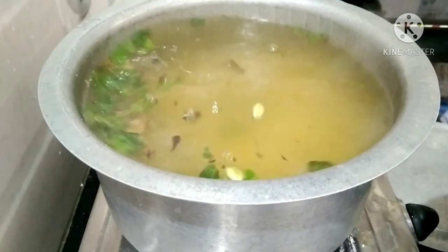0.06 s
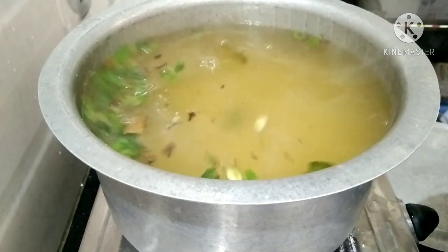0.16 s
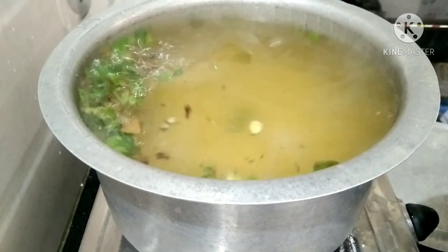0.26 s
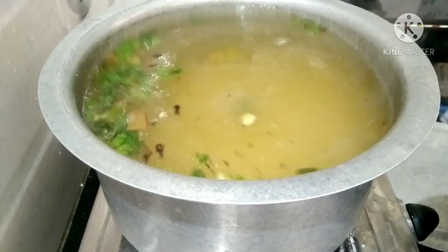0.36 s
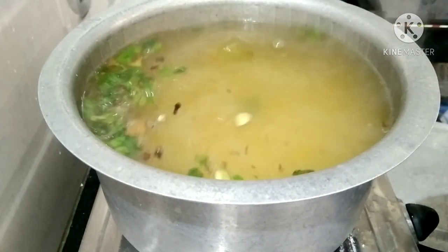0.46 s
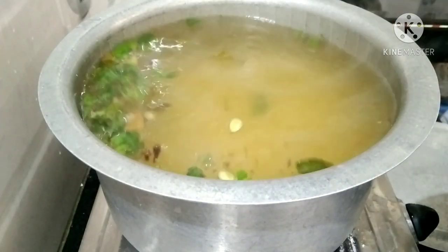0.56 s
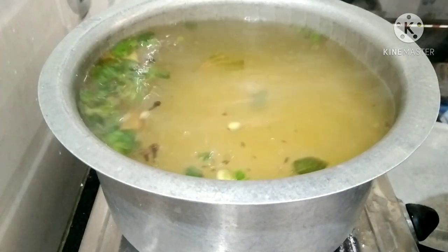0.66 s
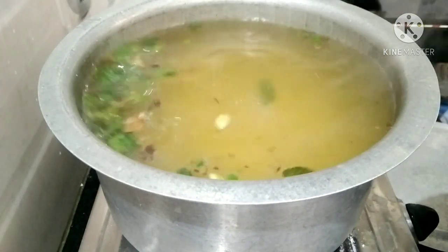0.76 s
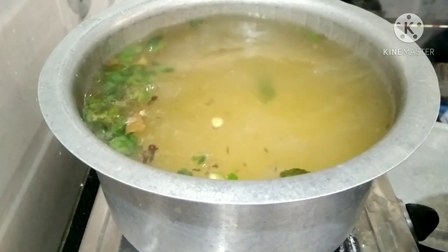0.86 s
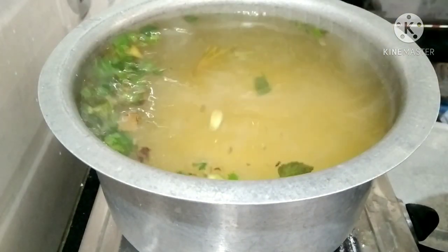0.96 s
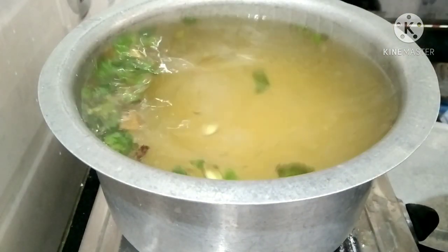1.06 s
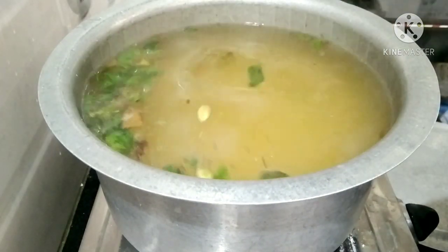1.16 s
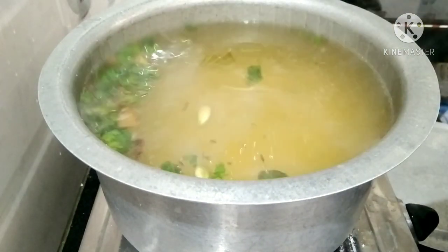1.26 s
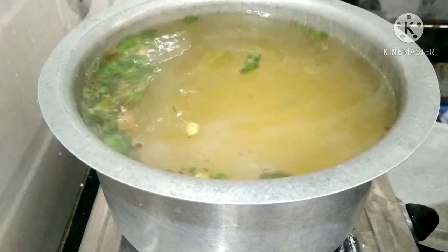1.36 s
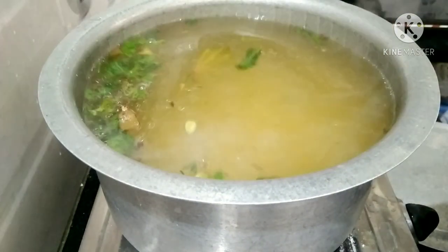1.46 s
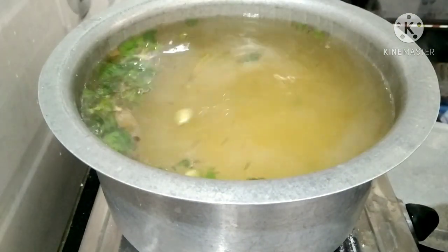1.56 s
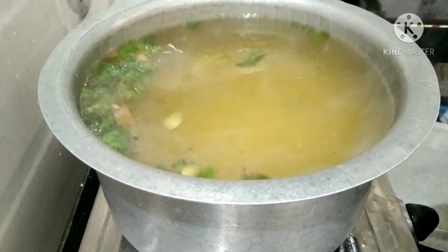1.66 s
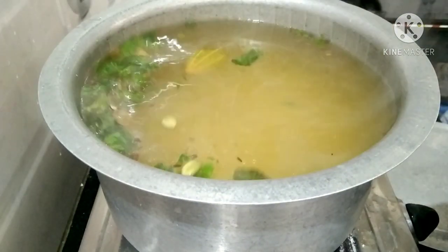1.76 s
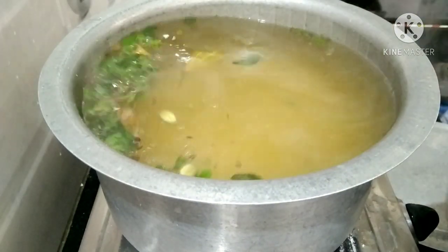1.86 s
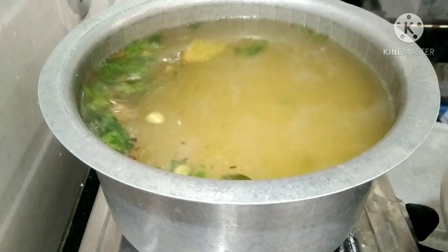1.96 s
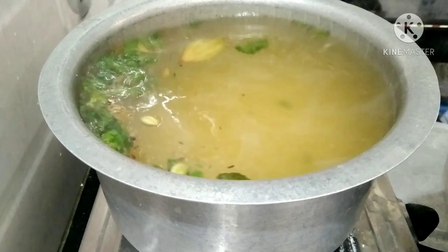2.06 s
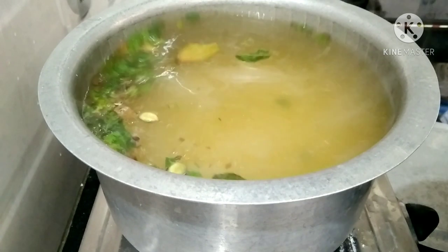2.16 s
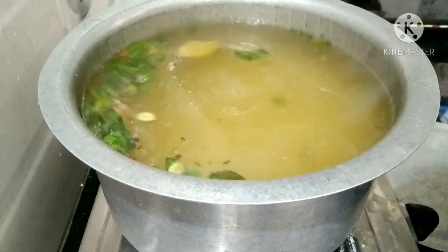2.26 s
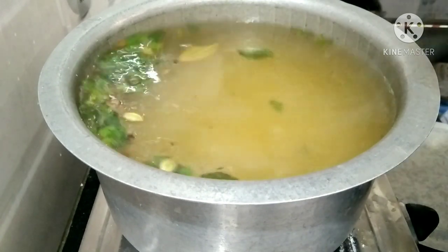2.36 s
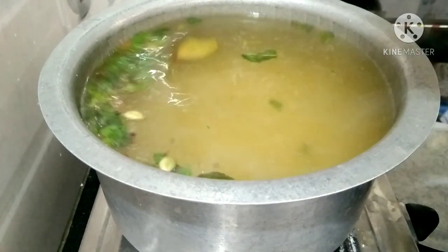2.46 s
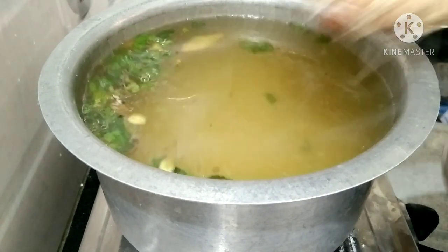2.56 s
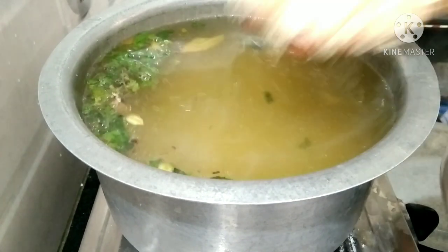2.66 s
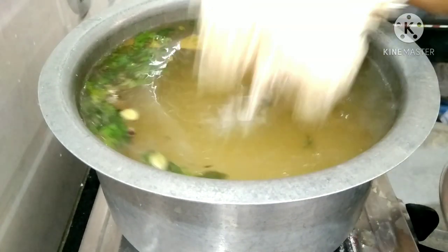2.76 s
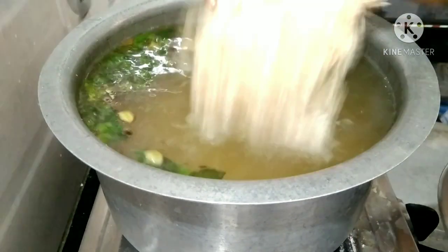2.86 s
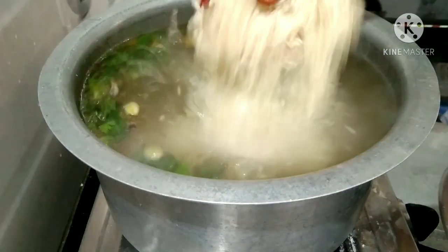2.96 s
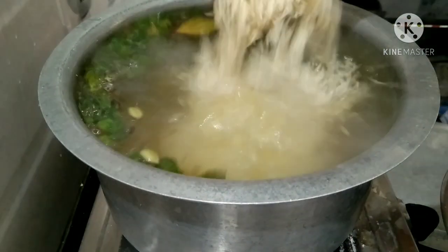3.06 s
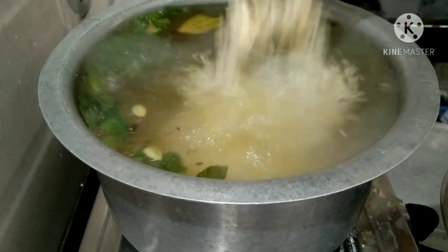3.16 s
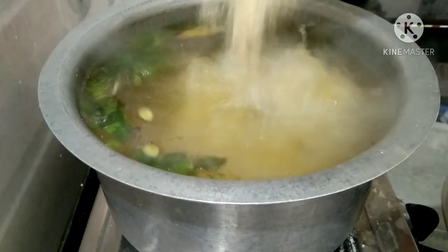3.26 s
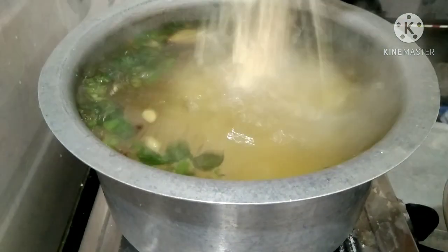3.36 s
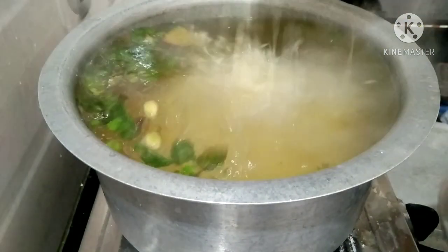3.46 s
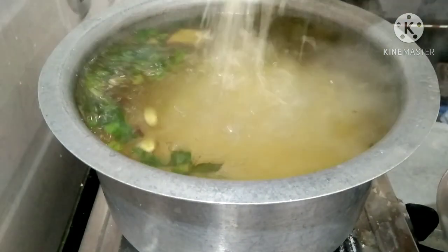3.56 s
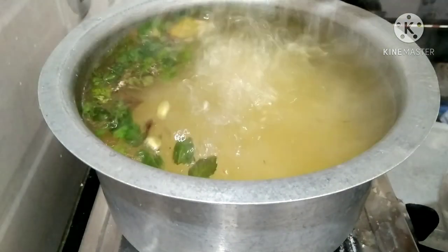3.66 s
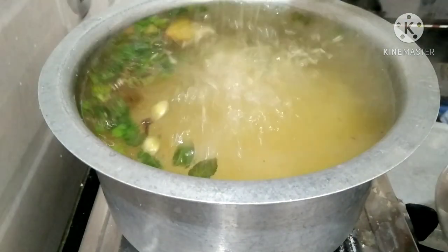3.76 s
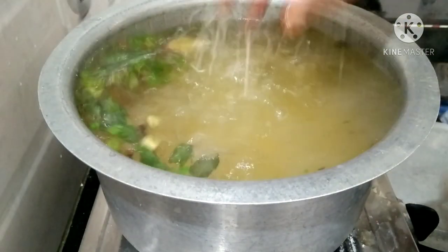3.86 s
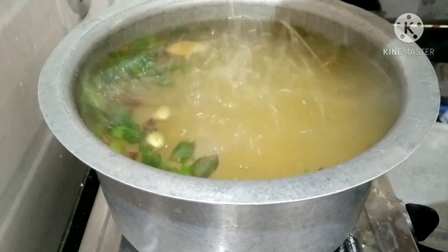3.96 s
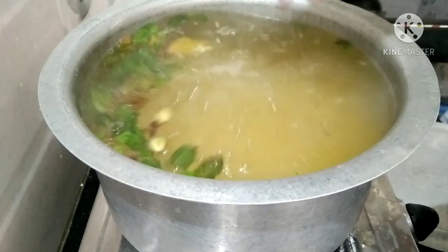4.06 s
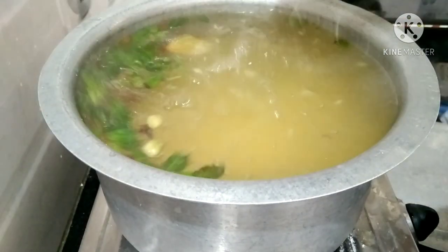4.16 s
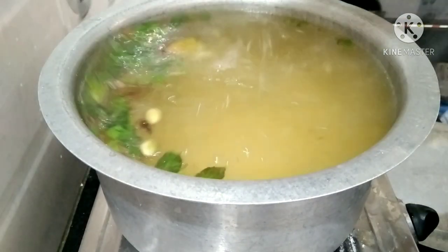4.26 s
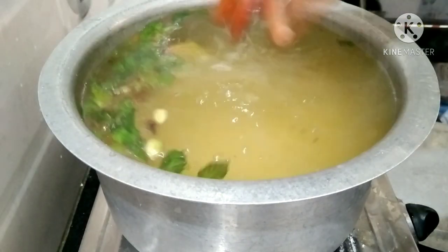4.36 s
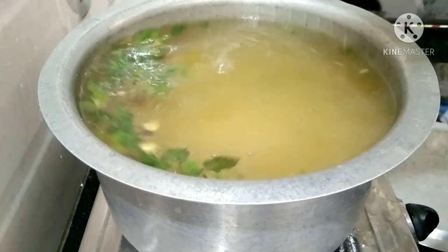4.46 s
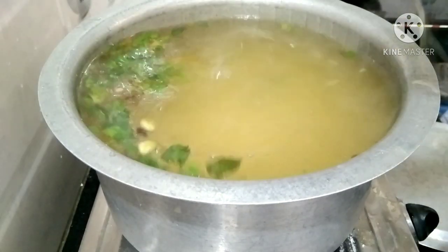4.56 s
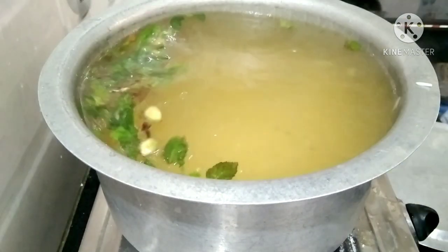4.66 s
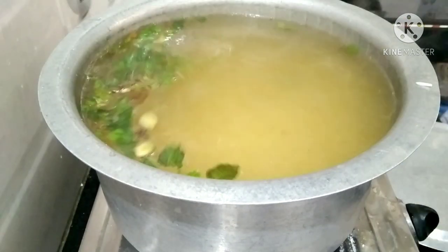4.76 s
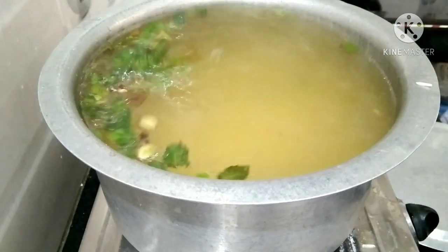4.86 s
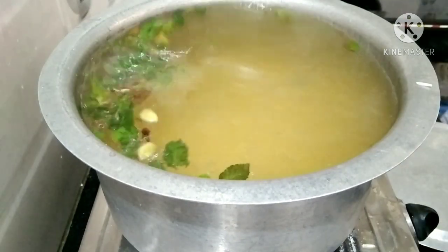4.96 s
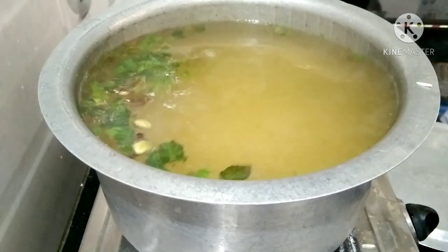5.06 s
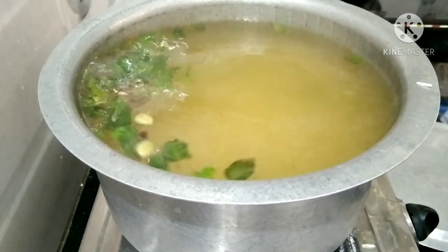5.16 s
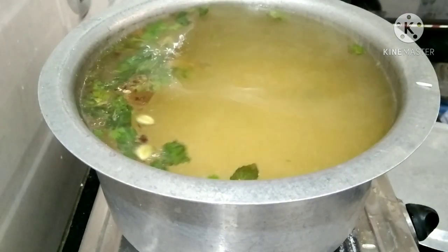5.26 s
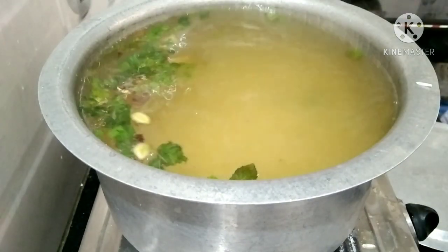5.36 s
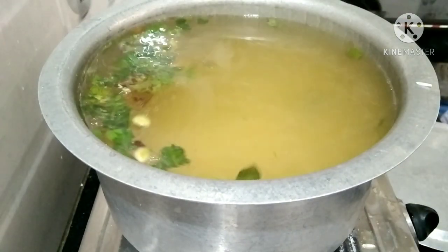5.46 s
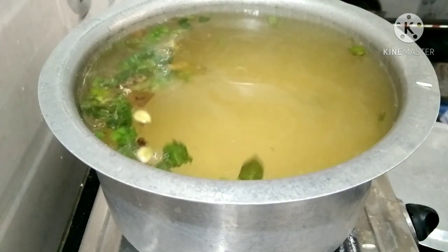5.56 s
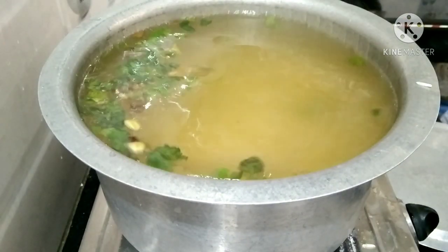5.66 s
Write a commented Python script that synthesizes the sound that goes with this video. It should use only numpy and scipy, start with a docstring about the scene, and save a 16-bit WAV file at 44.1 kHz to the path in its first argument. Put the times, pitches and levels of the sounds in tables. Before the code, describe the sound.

Broth bubbles and crackles in a wide metal pot, a handful of rice showers in with a bright splashing rush, then the boil returns with sizzling.

```python
"""A small kitchen: broth boils in a wide metal pot, one microphone over it.
Bubble layers are swarms of decaying sines; rumble, slosh and the roar of wellings are coloured noise.
Rice pours in as thousands of very short rings, with denser knots of grains; then the boil returns.
Water sizzles on the hot metal as a dense swarm; drops spit as noise bursts; films pop and single bubbles ring.
Thin whistles are narrow noise; the pot and the walls answer with resonances and echoes."""
import sys
import numpy as np
from scipy import signal
from scipy.io import wavfile
from scipy.ndimage import uniform_filter1d

SR = 44100
rng = np.random.default_rng(int(sys.argv[2]) if len(sys.argv) > 2 else 0)


def unload_wav(signal):
    """Save mono or channel-first audio to the path in sys.argv[1] as 16-bit WAV at rate SR, clipped to [-1, 1]."""
    wavfile.write(
        sys.argv[1],
        SR,
        np.round(np.clip(np.atleast_2d(signal).T, -1, 1) * 32767).astype(np.int16),
    )


N = 251370
TIME = np.arange(N) / SR  # s

# Vigour of the boil, knocked back by the cold rice before it returns stronger.
# Each row: time in seconds, vigour in dB.
BOIL_VIGOUR = [(0, -48), (.38, -62), (.56, -53.5), (.93, -58), (1.15, -66), (1.45, -59.5), (2.4, -58),
               (2.87, -64.5), (3.0, -52.5), (3.38, -60), (3.85, -65.5), (4.17, -68.5), (4.32, -58),
               (4.8, -48.5), (5.42, -47), (5.55, -53), (5.7, -46)]
USUAL_BOIL_DB, LURCHES_PER_S = -57, 14
# How each layer follows the boil: dB at the usual vigour, dB per dB of vigour, random lurching in dB.
RUMBLE, POCKETS, SLOSH = (-57.5, 0.93, 2.6), (-67, 0.49, 0.66), (-79.5, 2.12, 6.4)
GURGLE, BURBLE = (-63, 0.45, 1.8), (-67, 0.5, 2.2)  # large and middling surface bubbles
# Large steam pockets collapsing on the bottom. Each row: crest in seconds, level in dB.
THUMPS = [(.06, -53.5), (.51, -53), (.72, -80), (.95, -65), (1.3, -67), (1.42, -74), (1.555, -55.5),
          (1.66, -54), (2.23, -55.5), (2.55, -81), (3.23, -71), (4.33, -66), (4.62, -59), (4.84, -49),
          (5.2, -57), (5.39, -45)]
THUMP_RISE_S, THUMP_FALL_DB_PER_S = 0.061, 149
# Broth welling up in a dense rush of bubbles. Each row: crest in seconds, level in dB.
WELLINGS = [(.1, -82), (.4, -64.5), (1.13, -71), (1.33, -58.5), (1.88, -59), (2.76, -51), (3.19, -48.5),
            (3.35, -54.5), (4.86, -52.5), (4.96, -51), (5.19, -44), (5.26, -50), (5.39, -48.5), (5.66, -52)]
WELLING_RISE_S, WELLING_FALL_DB_PER_S = 0.068, 79
# Small bubbles simmering. Each row: time in seconds, level in dB.
SIMMER_LEVEL = [(0, -58), (.3, -55), (.52, -67.5), (.9, -54), (1.15, -52.5), (1.62, -83), (1.85, -47.5),
                (2.05, -73), (2.35, -95.5), (3.98, -66.5), (4.3, -63.5), (4.75, -58.5), (4.87, -61),
                (5.25, -57), (5.52, -60), (5.7, -52.5)]
# Large bubbles breaking the surface. Each row: start in seconds, relative level in dB, pitch in Hz.
GLUGS = [(0.078, -62, 1334), (.21, -62, 748), (.34, -71, 438), (.38, -60, 694), (0.399, -63, 1140),
         (.67, -57, 1500), (0.778, -55.5, 985), (.8, -69, 530), (0.932, -58, 936), (0.991, -68.5, 347),
         (1.02, -57.5, 752), (1.06, -76, 427), (1.21, -56.5, 760), (1.22, -71, 1030), (1.31, -66, 746),
         (1.359, -73, 515), (1.49, -60.5, 775), (1.72, -78, 1510), (1.83, -59.5, 639), (1.87, -60.5, 817),
         (1.969, -65.5, 1170), (2.045, -56, 723), (2.069, -72, 1220), (2.2, -68, 1134), (2.26, -61.5, 835),
         (2.33, -67, 645), (2.35, -68, 846), (2.51, -60.5, 530), (2.57, -66, 281), (2.64, -49.5, 588),
         (2.67, -68, 1440), (2.91, -58, 650), (2.915, -63, 1050), (3.245, -60, 797), (3.431, -55.5, 1274),
         (3.789, -56.5, 580), (3.979, -61.5, 1155), (4.01, -58.5, 626), (4.15, -59, 562), (4.279, -55, 556),
         (4.38, -67, 611), (4.439, -70.5, 231), (4.67, -53.5, 703), (4.81, -50.5, 987), (4.84, -57.5, 245),
         (4.91, -54, 887), (4.95, -58, 579), (5.25, -57, 760), (5.31, -54, 250), (5.37, -52, 224.8),
         (5.429, -59.5, 262), (5.639, -57, 250)]
GLUG_S, GLUG_CYCLES, GLUG_SCATTER = 0.065, 93, 0.082  # span, cycles per ring, detuning as a share of pitch
# Froth fizzing at the rim. Each row: time in seconds, relative level in dB.
FROTH_LEVEL = [(0, -52), (.33, -41), (.56, -50.5), (.67, -34.5), (.9, -56), (1.15, -49), (1.28, -73),
               (1.44, -51), (1.57, -73), (1.74, -54), (1.95, -90), (2.1, -61), (2.2, -66), (2.48, -59),
               (2.62, -62)]
# Tiniest bubbles prickling. Each row: time in seconds, level in dB.
PRICKLE_LEVEL = [(0, -72), (.55, -64), (.85, -56.5), (1.1, -55.5), (1.3, -68), (1.5, -57), (1.75, -62),
                 (1.95, -86), (2.25, -85), (2.6, -84)]
# Broth washing up the hot wall. Each row: crest in seconds, level in dB.
SURGES = [(.63, -42.5), (.687, -39.5), (.75, -42)]
SURGE_RISE_S, SURGE_FALL_DB_PER_S = 0.04, 100

POUR_START_S, POUR_END_S, POUR_RISE_S = 2.66, 3.73, 0.078
POUR_RELATIVE_DB, POUR_THIN_DB_PER_S, POUR_STOP_DB_PER_S = -36.5, 10.5, 114
# Thicker gouts within the stream. Each row: crest in seconds, relative level in dB.
GOUTS = [(2.745, -29), (2.94, -34.5), (3.075, -41), (3.15, -35), (3.26, -39), (3.387, -35.5), (3.5, -38.5),
         (3.635, -47)]
GOUT_RISE_S, GOUT_FALL_DB_PER_S = 0.034, 208
# First clumps of rice splashing in. Each row: crest in seconds, level in dB.
CLUMPS = [(2.66, -39), (2.73, -30.5), (2.755, -38)]
CLUMP_RISE_S, CLUMP_FALL_DB_PER_S = 0.01, 106
# Knots of grains smacking the water. Each row: start in seconds, relative level in dB, t60 in seconds.
KNOTS = [(2.938, -29, .012), (2.943, -33, 0.0091), (2.966, -28, .006), (2.973, -30, .008),
         (3.005, -24, 0.011), (3.066, -29, .008), (3.072, -26, .008), (3.1556, -28, 0.0062),
         (3.22, -36, .005), (3.266, -32, 0.0064), (3.305, -33, 0.0077), (3.3555, -31, .007),
         (3.5735, -34, .008)]
KNOT_GRAINS_PER_S = 9000
# Air dragged under by the rice, as bubbles of each size: dB relative to the flow.
DRAGGED_GURGLE_DB, DRAGGED_BURBLE_DB, DRAGGED_SIMMER_DB = -25.5, -21.5, -19.5
CROWD_SHARE, CROWD_RISE_S = .9, 1.0  # share of bubbling turned to a crowd of weak bubbles, and how soon

# Water sizzling on the hot wall. Each row: time in seconds, level in dB.
SIZZLE_LEVEL = [(3.7, -49), (4.0, -46.5), (4.3, -46.5), (4.85, -42), (5.3, -44), (5.45, -46), (5.7, -46.5)]
# Drops spitting on hot metal. Each row: start in seconds, relative level in dB, pitch in Hz,
# burst t60 in seconds, low slap in dB over the burst, trailing fizz in dB over the burst.
SPITS = [(0.201, -24.5, 8200, 0.0072, -9.5, -8), (0.3846, -29.5, 8300, 0.022, -11, -28),
         (3.078, -24, 8670, 0.045, -36, -18), (3.1558, -44, 8450, 0.014, 8, -4),
         (3.2254, -30, 8000, 0.013, -9, -22), (3.241, -29, 8250, 0.021, -16, -12),
         (3.248, -35, 3960, 0.02, 6.5, -32), (3.385, -28.5, 9300, 0.045, 0.5, -25),
         (3.3923, -21.5, 8330, 0.0039, -22, -17), (3.615, -36, 7700, 0.011, 6, -17),
         (3.93, -33, 9400, 0.0028, -10.5, -26), (4.617, -27.5, 8960, 0.033, -17, -31),
         (4.7025, -21, 8500, 0.043, -25, -29), (4.761, -17, 8500, 0.041, -51, -36),
         (4.821, -36, 5740, .02, 0, 16), (5.1366, -17.5, 7500, 0.02, -7, -20),
         (5.153, -37, 6950, 0.0052, -2, -11), (5.163, -35, 7500, 0.0089, -13, -25),
         (5.1938, -30.5, 7160, 0.045, -4.5, -10), (5.304, -44, 3640, 0.017, 6.5, 1)]
# Louder bubbles popping. Each row: start in seconds, relative level in dB, pitch in Hz,
# crack of the film in dB over the ring.
POPS = [(.035, -37, 4500, -6), (0.083, -18, 7900, -22), (.134, -42, 4500, -12), (0.165, -30.5, 4350, -9),
        (0.2402, -28, 8200, -13), (0.4958, -33.5, 8140, -4), (0.588, -38, 6750, -10),
        (0.5975, -40, 7500, 0), (0.615, -27.5, 8400, 9), (.6644, -36, 7490, -2), (0.683, -29.5, 7240, -10),
        (0.685, -30, 3400, -9), (0.738, -33, 4130, -14), (0.8587, -39, 8100, -1), (0.914, -31.5, 9800, 6),
        (0.952, -36.5, 4520, -2), (0.9647, -32, 5100, -5), (1.0176, -36, 9200, -11), (1.031, -35, 6050, -8),
        (1.041, -47, 9200, -6), (1.0611, -25.5, 7070, 8), (1.1027, -37, 4740, 4), (1.1183, -32.5, 5400, 12),
        (1.132, -33.5, 5500, -9), (1.159, -39, 6400, -7), (1.2114, -37.5, 7500, -4),
        (1.25, -40.5, 8360, -1), (1.309, -47, 5940, -24), (1.328, -43, 6000, -29), (1.345, -46, 6140, -24),
        (1.3722, -32, 6130, -2), (1.4008, -39, 8200, -21), (1.4267, -43.5, 10500, -15),
        (1.435, -40, 8300, -23), (1.4549, -34.5, 8300, -15), (1.492, -39.5, 7750, -7),
        (1.647, -35.5, 9100, -27), (1.6567, -35.5, 8300, -17), (1.6734, -41, 9300, -20),
        (1.717, -24, 8300, -26), (1.732, -30, 8200, 4), (1.7915, -36.5, 5400, 0), (1.897, -41, 8000, -4),
        (2.2194, -46.5, 10800, -11), (2.2387, -32, 4600, 8), (2.3042, -32, 4360, 4.5),
        (2.3216, -33, 8440, -29), (2.4016, -34, 4200, -3.5), (2.4286, -36, 8970, -28),
        (2.4785, -35, 8200, 11), (2.5107, -34, 3450, -2), (2.908, -21, 8000, -2), (3.031, -22.5, 3800, 3.5),
        (3.163, -22, 8700, -27), (3.4856, -12.5, 7800, 4.5), (3.6545, -23.5, 7800, 4)]
POP_CYCLES = 25  # cycles that a cavity rings, so small ones die sooner
# Single ringing bubbles, and two short rings at 5.136 and 5.137 s that give the drop spitting there its low
# thud. Each row: start in seconds, relative level in dB, pitch in Hz, t60 in seconds.
PLIPS = [(0.2043, -31, 2040, 0.0058), (0.788, -29, 2117, 0.027), (0.817, -35, 1673, 0.046),
         (0.908, -47.5, 257.5, 0.08), (1.102, -30, 1423, 0.013), (1.121, -39, 3550, 0.032),
         (1.3742, -39.5, 2700, 0.0061), (1.491, -40, 2900, 0.0093), (2.116, -49.5, 2740, 0.023),
         (2.13, -46.5, 1874, 0.044), (2.534, -47.5, 264, 0.026), (2.648, -46.5, 455, 0.077),
         (3.154, -41, 1400, 0.0073), (3.156, -40.5, 1940, 0.0092), (3.4814, -34.5, 2670, 0.0049),
         (5.137, -37, 800, 0.0034), (5.136, -34.5, 1380, 0.013), (5.547, -47, 426, 0.19)]
# Thin whistles and blurred rings. Each row: crest in seconds, level in dB, rise in seconds, fall in dB
# per second, settled pitch in Hz, bandwidth of each filter pole in Hz, share by which it starts sharp.
WHISTLES = [(.182, -47, 0.017, 155, 3460, 70, 0.059), (1.386, -55, 0.015, 79, 2684, 130, 0.033),
            (1.509, -68, 0.041, 67, 2910, 169, 0.0047), (1.663, -52, 0.019, 37, 3800, 72, .011),
            (1.81, -63.5, 0.026, 49, 1970, 129, 0.013), (1.861, -44, 0.037, 64, 3754, 70.6, 0.022),
            (2.419, -55.5, 0.016, 28, 2870, 260, 0.14), (2.832, -40, 0.059, 48, 3770, 55, .011),
            (4.561, -55, 0.066, 79, 2470, 141, .14), (4.712, -42, 0.0053, 132, 9000, 70, 0.06)]
WHISTLE_SETTLE_S = 0.06

# Spectra of the layers. Each row: frequency in Hz, relative level in dB per Hz.
RUMBLE_COLOUR = [(25, -28), (55, -38), (72, -20.5), (86, 0.5), (100, -6), (120, -9), (145, -16),
                 (300, -61.5)]
POCKET_COLOUR = [(90, -32), (135, 9.5), (165, 4), (190, -4), (226, -4.5), (270, -7), (350, -24), (600, -53)]
SLOSH_COLOUR = [(150, -9.5), (195, -6), (224, 13), (255, -9), (330, -26), (450, -13), (600, -21)]
GURGLE_COLOUR = [(200, -11), (350, -10.5), (440, -6), (520, 5), (600, 9), (680, 7.5), (760, -8), (860, -30),
                 (1100, -15.5)]
BURBLE_COLOUR = [(600, -13.5), (820, 3.5), (930, 3), (1050, 2), (1230, 18.5), (1450, -1.5), (1700, 2),
                 (2000, 4.5), (2500, -39)]
SIMMER_COLOUR = [(1100, -29), (1500, 7), (1750, -16), (2000, 14), (2250, 6), (2650, 21.5), (3000, 17),
                 (3500, 12), (4200, -19), (6000, -36), (15000, -54)]
ROAR_COLOUR = [(200, -2.5), (360, -19), (520, -17.5), (720, 6.5), (950, -0.5), (1080, -0.5), (1230, 7),
               (1400, -4.5), (1600, 6), (1800, -5), (2020, -2), (2300, -4.5), (3000, -38)]  # a welling's bubbles, too many to tell apart
FROTH_COLOUR = [(2000, -23), (2650, -3.5), (3500, -13), (4400, 1), (5200, 0), (6200, 1), (7600, 6),
                (8500, 6), (10000, -7), (12000, -12), (15500, -22)]
PRICKLE_COLOUR = [(4000, -16), (6000, -9), (8200, -1), (10000, -1), (12000, -6.5), (15500, -4)]
SURGE_COLOUR = [(800, -6), (1600, -1), (2600, 2), (3700, 3), (6200, 3), (8000, 8), (10000, -5.5),
                (12500, -13), (15500, -20)]
CLUMP_COLOUR = [(900, -87), (1350, -9), (1650, -11), (1950, 1.5), (2300, -31), (2850, -3), (4200, -12),
                (5700, -3), (7000, -2), (8400, 6.5), (11000, -2), (13000, -10), (15500, -10)]
POUR_COLOUR = [(700, -24), (1400, -21.5), (1800, -15.5), (2100, -7.5), (3000, -7), (4200, -5), (6300, -4.5),
               (7300, -2.5), (8100, 2.5), (9300, -4.5), (11000, -10.5), (13000, -16), (15500, -17)]
SIZZLE_COLOUR = [(2000, -29), (2700, -3), (3200, -7.5), (3600, -8), (4000, -0.5), (4400, -1.5), (4900, 1),
                 (5400, -0.5), (6200, -1), (7300, 5), (8200, 6.5), (9200, 1.5), (11000, -7), (13500, -11),
                 (15500, -15)]
SPIT_COLOUR = [(1500, -25), (3500, -26), (4500, 4), (6500, 3), (8000, 6), (10000, -14), (12000, -4.5),
               (15500, -15)]
SLAP_COLOUR = [(250, -29), (600, -21), (1300, -4), (1800, 9), (2600, 23), (4000, 23.5), (6000, 17),
               (10000, 16), (15000, -5)]
CRACK_COLOUR = [(1500, -118), (3500, -8), (4600, 20.5), (6500, 17), (8200, 26), (10000, 22), (12000, 5),
                (15500, 6)]
AIR_COLOUR = [(20, 6), (38, -11), (60, 13), (150, -30), (400, -4), (2000, -42), (15000, -50)]

# Resonances of the pot's air and metal. Each row: frequency in Hz, width in Hz, dB over the direct sound.
POT = [(570, 310, -34), (752, 5.7, 11), (811, 20, 5.5), (987, 13, 6), (1344, 7.3, -1), (1440, 120, -9),
       (2600, 13, -30), (3600, 59, 4.5), (4260, 40, -11), (4500, 22, -15), (8200, 35, -6), (9500, 12, 8)]
# Bands that echoes in the pot cancel. Each row: centre in Hz, width in Hz, gain in dB at depth 1.
HOLLOWS = [(2320, 150, -15), (3250, 130, -7), (3880, 220, -11), (4950, 170, -12), (6400, 200, -3)]
WANDERS_PER_S = 2.9
# Reverberation of the kitchen. Each row: frequency in Hz, t60 in seconds.
KITCHEN_T60 = [(150, 0.83), (1000, 0.27), (3000, 0.37), (8000, 0.28), (15000, 0.67)]
EDGE_HZ = 15850


def gain_of(db):
    """Decibels to amplitude."""
    return 10 ** (np.asarray(db) / 20)


def evened(x):
    """Scales to rms 1."""
    return x / np.sqrt(np.mean(x ** 2) + 1e-20)


def unit(x):
    """Scales to energy 1."""
    return x / (np.linalg.norm(x) + 1e-12)


def steadied(x, span_s):
    """Holds the running rms at 1, leaving flicker faster than the span."""
    size = max(int(span_s * SR), 2)
    power = uniform_filter1d(uniform_filter1d(x ** 2, size), size)
    return x / np.sqrt(abs(power) + 1e-20)


def add(mix, start_s, sound):
    """Mixes a sound in at a start time."""
    part = mix[max(round(start_s * SR), 0):][:len(sound)]
    part += sound[:len(part)]


def read(points, hz):
    """Interpolates a table on a log-frequency axis."""
    f, value = np.transpose(points)
    return np.interp(np.log(hz + 1), np.log(f + 1), value)


def coloured(x, points, size=8192):
    """Minimum-phase causal filter with the given spectrum."""
    db = np.maximum(read(points, abs(np.fft.fftfreq(size, 1 / SR))), -100)
    log_gain = np.log(gain_of(db))
    taps = np.fft.ifft(np.exp(np.conj(signal.hilbert(log_gain)))).real[:size // 2]
    return signal.oaconvolve(x, taps)[:len(x)]


def dying(t, t60):
    """Exponential decay by 60 dB in t60 seconds."""
    return np.exp(-np.log(1000) * t / np.maximum(t60, 1e-4))


def level(rows):
    """Gain over time from a dB curve, fading quickly outside its span."""
    s, db = np.transpose(rows)
    outside_s = np.maximum(s[0] - TIME, 0) + np.maximum(TIME - s[-1], 0)
    return gain_of(np.interp(TIME, s, db) - 450 * outside_s)


def swell(crest_s, db, rise_s, fall_db_per_s):
    """Gain that swells to a crest, then falls evenly in dB."""
    early = np.maximum(crest_s - TIME, 0) / max(rise_s, 1e-3)
    fall_db = fall_db_per_s * np.maximum(TIME - crest_s, 0)
    return gain_of(np.maximum(db - fall_db - 10 * early ** 2, -200))


def together(*gains):
    """Independent sounds add in power."""
    return np.sqrt(sum(g ** 2 for g in gains))


def swells(rows, rise_s, fall_db_per_s):
    """One swell of the same shape for each event row."""
    return together(*[swell(s, db, rise_s, fall_db_per_s) for s, db in rows])


def bubble(hz, t60, rise=0.023):
    """A pocket of gas rings; its pitch climbs as it surfaces."""
    t60 = max(t60, .001)
    t = np.arange(int(t60 * SR)) / SR
    onset = 1 - np.exp(-(t * hz / 2.9) ** 2)
    ring = np.sin(2 * np.pi * hz * t * (1 + rise * t / t60))
    return unit(onset * dying(t, t60) * ring)


def swarm(per_s, lo_hz, hi_hz, cycles, spread_db, count=34):
    """Random bubbles of many sizes, with an even spectrum and a steady mean level."""
    strengths = gain_of(spread_db * np.minimum(rng.exponential(1, N), 4)) * rng.choice([-1, 1], N)
    births = np.flatnonzero(rng.random(N) < per_s / SR)
    kind = rng.integers(count, size=N)[births]
    out = np.zeros(N)
    for k, hz in enumerate(np.geomspace(lo_hz, min(hi_hz, SR / 2.5), count)):
        ring = np.sqrt(hz) * bubble(hz, cycles / hz)
        at = births[kind == k, None]
        places = (at + np.arange(len(ring))).ravel()
        out += np.bincount(places, (strengths[at] * ring).ravel(), N)[:N]
    return evened(out)


def boiling(usual_db, follow, lurch_db):
    """Gain of one layer: it follows the vigour of the boil and lurches at random."""
    chance = rng.standard_normal(256)
    lurch = np.interp(TIME * LURCHES_PER_S, np.arange(len(chance)), chance)
    vigour_db = np.interp(TIME, *np.transpose(BOIL_VIGOUR)) - USUAL_BOIL_DB
    return gain_of(usual_db + follow * vigour_db + lurch_db * lurch)


def boil(thump_rumble_db=-3):
    """Steam pockets swell and collapse on the pot's bottom; a hard boil sets the broth sloshing."""
    rumble = steadied(coloured(rng.standard_normal(N), RUMBLE_COLOUR), 0.085)
    pockets = swarm(per_s=260, lo_hz=98.3, hi_hz=585, cycles=33.0, spread_db=4.46, count=16)
    pockets = steadied(coloured(pockets, POCKET_COLOUR), 0.059)
    slosh = steadied(coloured(rng.standard_normal(N), SLOSH_COLOUR), 0.12)
    thumps = swells(THUMPS, THUMP_RISE_S, THUMP_FALL_DB_PER_S)
    rumble = together(boiling(*RUMBLE), gain_of(thump_rumble_db) * thumps) * rumble
    return rumble + together(boiling(*POCKETS), thumps) * pockets + boiling(*SLOSH) * slosh


def seeded(lazy, busy):
    """Clear broth bubbles lazily; the rice seeds a crowd of weaker bubbles that take over."""
    share = CROWD_SHARE * np.clip((TIME - POUR_START_S) / CROWD_RISE_S, 0, 1)
    return np.sqrt(1 - share) * lazy + np.sqrt(share) * busy


def gurgle(pour):
    """Large bubbles break the surface, driven by the boil and by air dragged under."""
    lazy = swarm(per_s=110, lo_hz=284, hi_hz=1011, cycles=36, spread_db=4.5)
    busy = swarm(per_s=350, lo_hz=284, hi_hz=1011, cycles=32, spread_db=3.5)
    sound = coloured(seeded(lazy, busy), GURGLE_COLOUR)
    gain = together(boiling(*GURGLE), gain_of(DRAGGED_GURGLE_DB) * pour)
    return gain * steadied(pot(kitchen(sound, wet_db=-3)), 0.34)


def burble(pour):
    """Middling bubbles do the same at a higher pitch, under a heaving surface."""
    lazy = swarm(per_s=130, lo_hz=767, hi_hz=2150, cycles=110, spread_db=4.5)
    busy = swarm(per_s=800, lo_hz=767, hi_hz=2150, cycles=90, spread_db=3)
    sound = heaving(coloured(seeded(lazy, busy), BURBLE_COLOUR), depth_db=3.5)
    gain = together(boiling(*BURBLE), gain_of(DRAGGED_BURBLE_DB) * pour)
    return gain * steadied(pot(kitchen(sound, wet_db=-7.0)), 0.057)


def simmer(pour):
    """Small bubbles follow their own level curve and the rice."""
    lazy = swarm(per_s=500, lo_hz=1300, hi_hz=5000, cycles=60, spread_db=4.5, count=60)
    busy = swarm(per_s=2700, lo_hz=1300, hi_hz=6840, cycles=14, spread_db=5)
    sound = kitchen(coloured(seeded(lazy, busy), SIMMER_COLOUR), wet_db=2)
    sound = heaving(hollowed(sound, depth=.6), depth_db=5, size=7)
    gain = together(level(SIMMER_LEVEL), gain_of(DRAGGED_SIMMER_DB) * pour)
    return gain * steadied(pot(sound), 0.54)


def roar():
    """A welling merges its bubbles into coloured noise."""
    rush = heaving(rng.standard_normal(N), depth_db=3.2)
    welling = swells(WELLINGS, WELLING_RISE_S, WELLING_FALL_DB_PER_S)
    return welling * steadied(pot(coloured(rush, ROAR_COLOUR)), 0.046)


def surface():
    """Bubbles of three sizes and the wellings break the surface."""
    pour = flow()
    return gurgle(pour) + burble(pour) + simmer(pour) + roar()


def glugs(glugs_db=34, count=4):
    """A large bubble breaks into a few of nearly one pitch that ring together."""
    out = np.zeros(N)
    for s, db, hz in GLUGS:
        glug = np.zeros(SR // 2)
        for k, (detune, late) in enumerate(rng.uniform(-0.98, 1, (count, 2))):
            pitch_hz = hz * (1 + GLUG_SCATTER * detune)
            delay_s = GLUG_S * (k + .5 + .5 * late) / count
            add(glug, delay_s, bubble(pitch_hz, GLUG_CYCLES / pitch_hz))
        add(out, s, gain_of(db + glugs_db) * unit(kitchen(glug, wet_db=-18.0)))
    return out


def prickle(per_s, wet_db=-8):
    """Sparse, sharp ticks of the tiniest bubbles."""
    ticks = swarm(per_s, lo_hz=5000, hi_hz=14500, cycles=20, spread_db=5)
    return kitchen(evened(coloured(walls(ticks)[:N], PRICKLE_COLOUR)), wet_db=wet_db)


def froth(fizz_db=-6):
    """Tiny bubbles fizz in shifting patches and prickle in the froth."""
    fizz = swarm(per_s=5000, lo_hz=2100, hi_hz=15300, cycles=12, spread_db=1.5)
    fizz = hollowed(kitchen(coloured(fizz, FROTH_COLOUR), wet_db=-3), depth=.3)
    fizz = steadied(heaving(fizz, depth_db=5, even_hz=20000, size=7), 0.05)
    return gain_of(fizz_db) * level(FROTH_LEVEL) * fizz + level(PRICKLE_LEVEL) * prickle(per_s=100)


def surge(coarse_hz=3800):
    """Broth washes up the hot wall and seethes: fine bubbles first, coarser ones only near the crest."""
    grains = swarm(per_s=3800, lo_hz=1060, hi_hz=17200, cycles=8.5, spread_db=2.5)
    seethe = steadied(kitchen(coloured(grains, SURGE_COLOUR), wet_db=-5.5), 0.025)
    coarse = signal.sosfiltfilt(signal.butter(2, coarse_hz, fs=SR, output="sos"), seethe)
    wash = swells(SURGES, SURGE_RISE_S, SURGE_FALL_DB_PER_S)
    return wash * (seethe - coarse * (1 - wash / wash.max()))


def stream():
    """Gain of the steady stream of rice, which thins and then stops."""
    t = np.maximum(TIME - POUR_START_S, 0)
    thinning_db = POUR_THIN_DB_PER_S * t + POUR_STOP_DB_PER_S * np.maximum(TIME - POUR_END_S, 0)
    return np.minimum(t / POUR_RISE_S, 1) * gain_of(POUR_RELATIVE_DB - thinning_db)


def flow():
    """Gain of the stream with its thicker gouts."""
    return together(stream(), swells(GOUTS, GOUT_RISE_S, GOUT_FALL_DB_PER_S))


def rice(clusters_db=-5):
    """Clumps splash in, then thousands of grains tick into the water; a few clusters hit harder."""
    splash = swarm(per_s=18000, lo_hz=910, hi_hz=16000, cycles=4.4, spread_db=-0.5)
    splash = steadied(coloured(splash, CLUMP_COLOUR), 0.0043)
    ticks = swarm(per_s=3000, lo_hz=964, hi_hz=16100, cycles=6, spread_db=4)
    ticks = kitchen(coloured(ticks, POUR_COLOUR), wet_db=-3)
    ticks = steadied(heaving(ticks, depth_db=3.5, even_hz=8000, size=5), 0.045)
    hits = rng.uniform(-1, 1, N) * (rng.random(N) < 130 / SR)  # 130 per second
    clusters = gain_of(clusters_db) * evened(coloured(walls(hits)[:N], POUR_COLOUR))
    clumps = swells(CLUMPS, CLUMP_RISE_S, CLUMP_FALL_DB_PER_S)
    return clumps * splash + 0.92 * flow() * ticks + stream() * clusters


def knots(knots_db=13):
    """A knot of grains smacks the water in a quick, uneven patter."""
    out, t = np.zeros(N), np.arange(SR // 20) / SR
    for s, db, t60 in KNOTS:
        struck = rng.standard_normal(len(t)) * (rng.random(len(t)) < KNOT_GRAINS_PER_S / SR)
        knot = unit(coloured(struck * dying(t, t60), POUR_COLOUR))
        add(out, s, gain_of(db + knots_db) * kitchen(knot, wet_db=-8))
    return out


def sizzle():
    """A film of water boils off the hot wall in a fine, even hiss."""
    hiss = swarm(per_s=23000, lo_hz=2810, hi_hz=17100, cycles=2.6, spread_db=-5.5)
    hiss = hollowed(kitchen(coloured(hiss, SIZZLE_COLOUR), wet_db=-6), depth=1)
    hiss = heaving(hiss, depth_db=4, even_hz=6000, size=9)
    return level(SIZZLE_LEVEL) * steadied(pot(hiss), 0.11)


def spits(spits_db=23):
    """A drop flashes to steam: a sharp burst, a low slap, and a fizz as the spray lands."""
    out, t = np.zeros(N), np.arange(SR // 3) / SR
    for s, db, hz, t60, low_db, fizz_db in SPITS:
        steam, thud = rng.standard_normal((2, len(t)))
        burst = dying(t, t60) + gain_of(fizz_db) * dying(t, 0.17)
        crack = unit(coloured(steam * burst, SPIT_COLOUR))
        ring = unit(signal.oaconvolve(steam * burst, bubble(hz, 0.00046))[:len(t)])
        slap = unit(coloured(thud * (burst + 0.11 * dying(t, 0.59)), SLAP_COLOUR))
        spit = unit(crack + 2.0 * ring) + gain_of(low_db) * slap
        add(out, s, gain_of(db + spits_db) * kitchen(spit, wet_db=-9))
    return out


def pops(pops_db=15):
    """The film of a bubble cracks and its cavity rings for a moment."""
    out, t = np.zeros(N), np.arange(SR // 40) / SR
    for s, db, hz, crack_db in POPS:
        tear = rng.standard_normal(len(t)) * dying(t, .0027)
        pop = unit(coloured(tear, CRACK_COLOUR)) * gain_of(crack_db)
        add(pop, 0, bubble(hz, POP_CYCLES / hz))
        add(out, s, gain_of(db + pops_db) * kitchen(unit(walls(pop)), wet_db=-8.5))
    return out


def plips(plips_db=21):
    """Single bubbles ring with a clear pitch; two short rings give a spitting drop its low thud."""
    out = np.zeros(N)
    for s, db, hz, t60 in PLIPS:
        plip = unit(walls(bubble(hz, t60, rise=0.0046)))
        add(out, s, gain_of(db + plips_db) * kitchen(plip, wet_db=-6.0))
    return out


def whistle(octave_db=-16):
    """Narrow noise with a faint octave, as of steam through a gap; it sags to its settled pitch."""
    out, t = np.zeros(N), TIME[:SR]
    for s, db, rise_s, fall_db_per_s, hz, width_hz, sharp in WHISTLES:
        start_s = max(s - 3 * rise_s, 0)
        r = np.exp(-2 * np.pi * width_hz / SR)
        noise = rng.standard_normal(SR) + 1j * rng.standard_normal(SR)
        flutter = signal.lfilter([1], np.poly([r, r, r]), noise)
        settling = np.exp(-np.maximum(t - 2 * rise_s, 0) / WHISTLE_SETTLE_S)
        pitch_hz = hz * (1 + sharp * settling)
        tone = flutter * np.exp(2j * np.pi * np.cumsum(pitch_hz) / SR)
        octave = steadied((tone ** 2).real, 0.049)  # squaring doubles the pitch
        tone = steadied(tone.real, 0.057) + gain_of(octave_db) * octave
        add(out, start_s, swell(s - start_s, db, rise_s, fall_db_per_s)[:SR] * tone)
    return out


def heaving(x, depth_db, even_hz=5000, size=14):
    """As the surface heaves, echoes lift and hollow out shifting bands, smoothed over size frames."""
    hz, _, z = signal.stft(x, SR, nperseg=1024)
    patches = rng.standard_normal(z.shape)
    for _ in range(2):
        patches = uniform_filter1d(uniform_filter1d(patches, size=6, axis=0), size=size, axis=1)
    shift_db = depth_db * evened(patches) / (1 + (hz[:, None] / even_hz) ** 2)  # treble evens out
    return signal.istft(z * gain_of(shift_db), SR, nperseg=1024)[1][:N]


def hollowed(x, depth, wander=0.013):
    """Echoes between broth and wall cancel a few bands, which wander as the surface moves."""
    hz, s, z = signal.stft(x, SR, nperseg=1024)
    for centre_hz, width_hz, db in HOLLOWS:
        drift = np.interp(s * WANDERS_PER_S, np.arange(128), rng.standard_normal(128))
        offset = (hz[:, None] - centre_hz * (1 + wander * drift)) / width_hz
        z = z * gain_of(depth * db * np.exp(-offset ** 2))
    return signal.istft(z, SR, nperseg=1024)[1][:N]


def pot(x):
    """Air and metal of the pot resonate in a few bands."""
    return x + sum(gain_of(db) * signal.lfilter(*signal.iirpeak(hz, hz / width_hz, SR), x)
                   for hz, width_hz, db in POT)


def walls(x, count=6):
    """Echoes off the pot's wall within a few ms, drawn anew for each call."""
    out = np.concatenate([x, np.zeros(SR // 100)])
    for delay_s, sign in zip(rng.uniform(.0004, .0035, count), rng.choice([-1, 1], count)):
        add(out, delay_s, .38 * sign * np.exp(-delay_s / .0025) * x)
    return out


def kitchen(x, wet_db):
    """Adds a tail of sparse wall echoes, new for each call, each band dying at its own speed."""
    t = np.arange(SR // 2) / SR
    onset = np.clip((t - .005) / .005, 0, 1)
    taps = rng.choice([-1, 1], len(t)) * (rng.random(len(t)) < .25) * onset
    hz, s, z = signal.stft(taps, SR, nperseg=256)
    z = z / (1 + (hz[:, None] / 12000) ** 4)  # the walls soak up the top treble
    tail = signal.istft(z * dying(s, read(KITCHEN_T60, hz)[:, None]), SR, nperseg=256)[1]
    out = gain_of(wet_db) * signal.oaconvolve(x, unit(tail))
    add(out, 0, x)
    return out[:N]


def air(air_db=-75):
    """The faint low hush of the room, as coloured noise."""
    return gain_of(air_db) * evened(coloured(rng.standard_normal(N), AIR_COLOUR))


def scene():
    """Everything reaches one microphone, the same in both channels."""
    broth = boil() + surface() + glugs() + froth() + surge()
    pour = rice() + knots()
    details = sizzle() + pops() + spits() + plips() + whistle()
    mono = broth + pour + details + air()
    return np.array([mono, mono])


def record(dry):
    """The recorder's band limit: a linear-phase low-pass."""
    taps = signal.firwin(401, EDGE_HZ, window=("kaiser", 8), fs=SR)
    return signal.oaconvolve(dry, taps[None], "same")


dry = scene()
out = record(dry)
unload_wav(out)
```